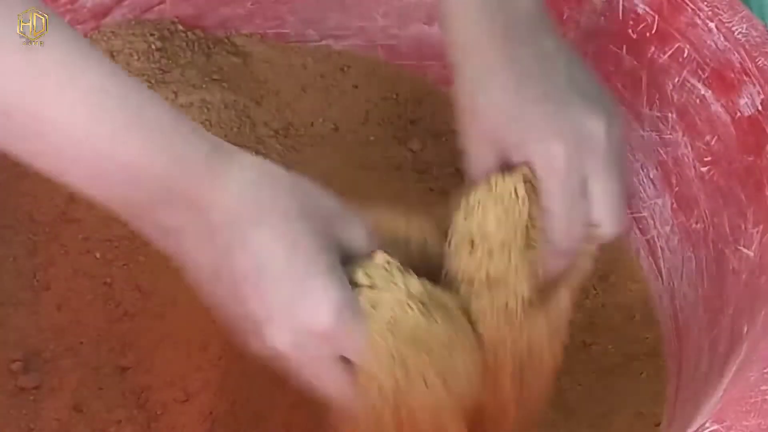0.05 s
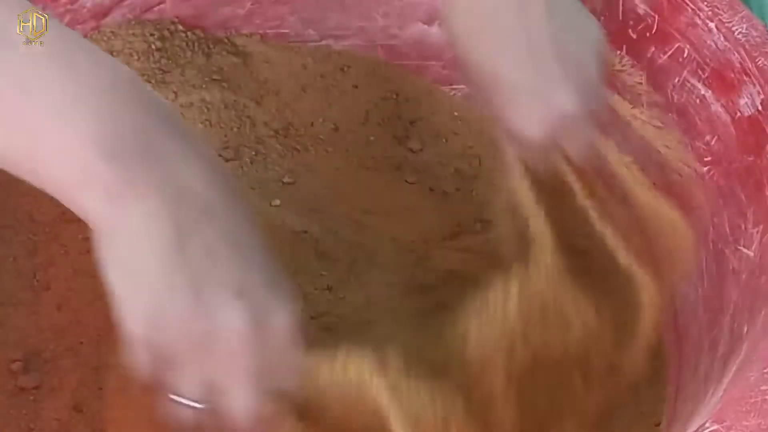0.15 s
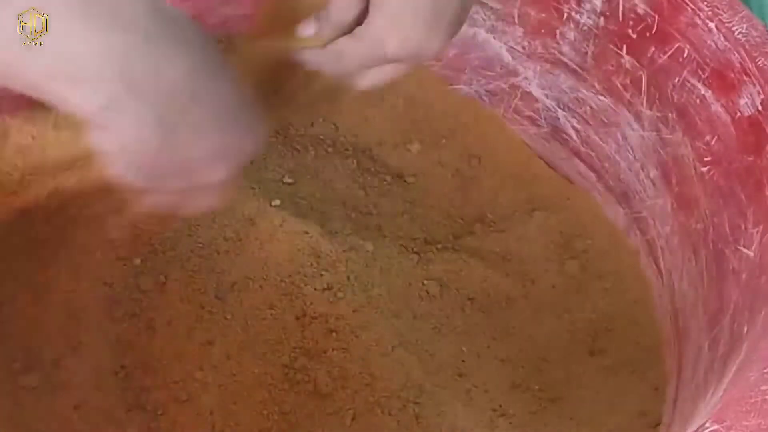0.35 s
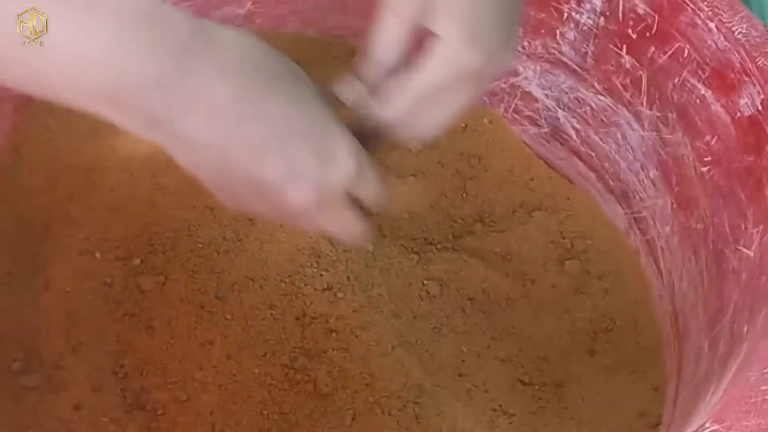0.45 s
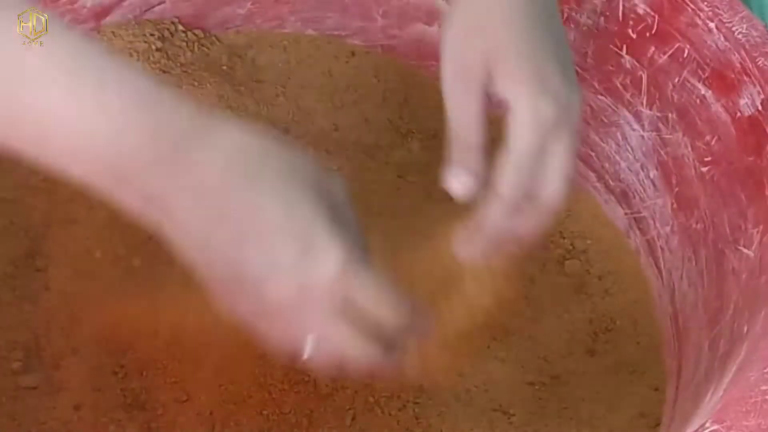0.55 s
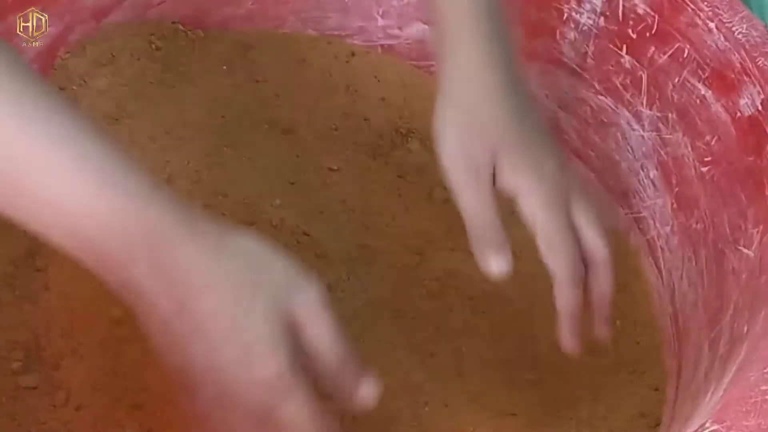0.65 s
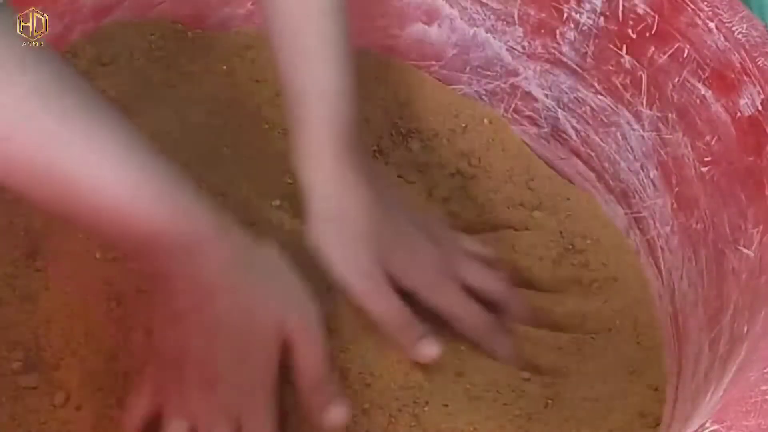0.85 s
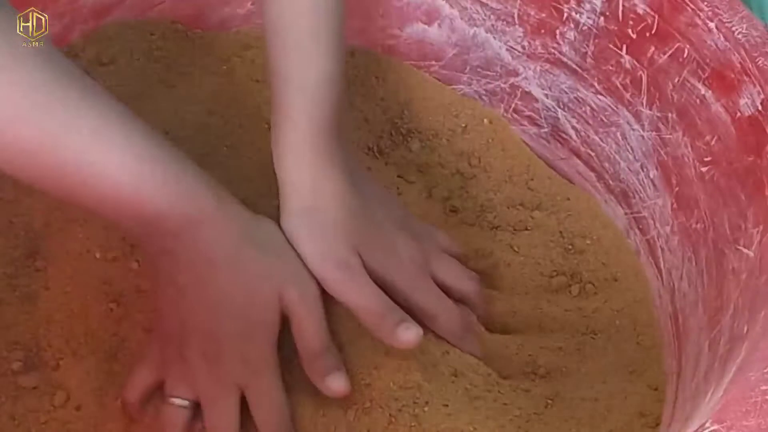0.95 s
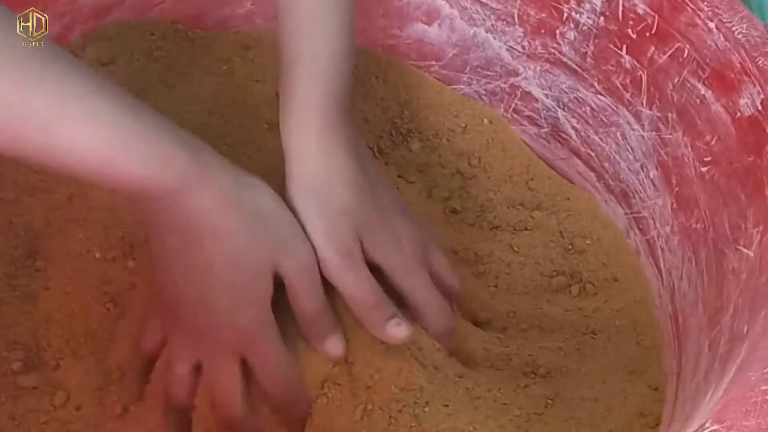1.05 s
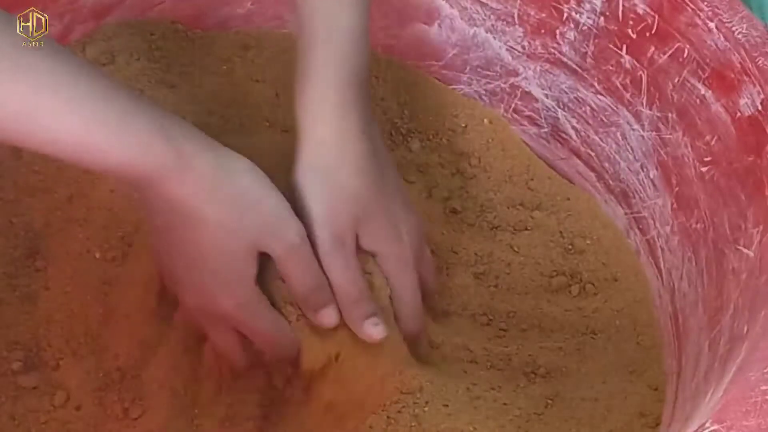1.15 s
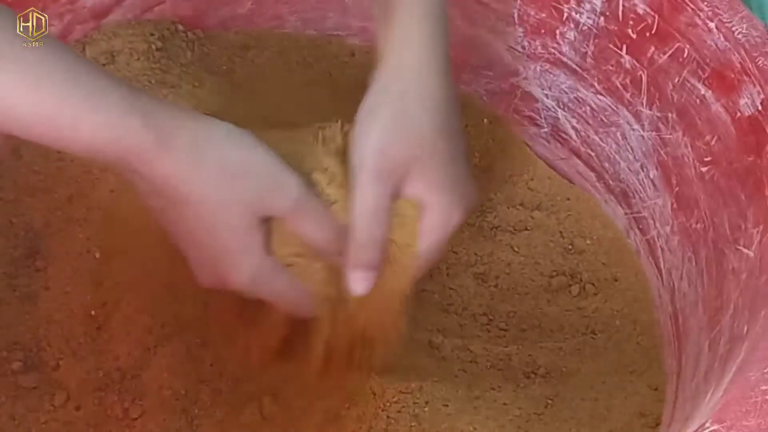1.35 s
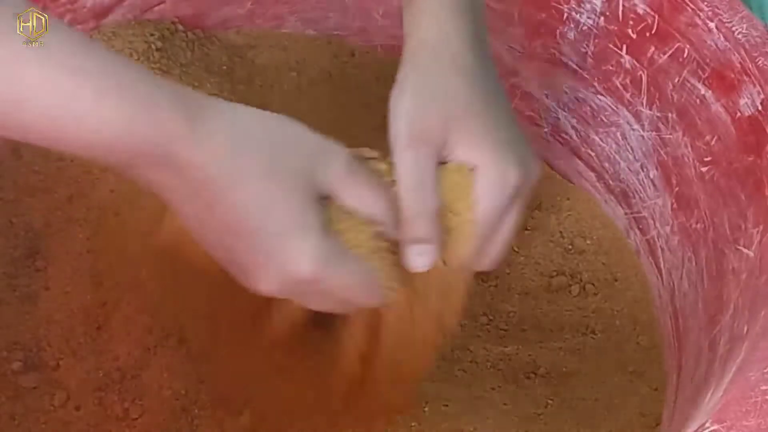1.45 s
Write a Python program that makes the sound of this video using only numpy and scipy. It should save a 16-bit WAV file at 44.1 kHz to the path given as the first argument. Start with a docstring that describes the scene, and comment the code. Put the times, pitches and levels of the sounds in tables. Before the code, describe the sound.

Dry sand crunches close up as hands crush a block from about 0.2 to 0.5 seconds, with sharp snaps and grains pattering into a plastic tub. A few crumbs tick down. At 0.8 seconds the hands land with a soft knock and a gritty push, then brush the sand with a quiet rustle fading by about 1.3 seconds. A small room hums faintly underneath.

```python
"""Crushing dry sand

Two hands crush a block of dry sand at close range: it snaps, crackles and pours into a plastic tub.
Each brittle fracture is a sharp crack plus the damped knock of a lump; stray crumbs tick down.
The hands land on the sand bed with a knock, push through it and brush it together with a gritty rustle.
The tub wall resonates, and a small room with a low hum answers faintly."""
import sys
import numpy as np
from scipy import signal
from scipy.fft import rfft, irfft, next_fast_len
from scipy.io import wavfile

SR = 44100
rng = np.random.default_rng(int(sys.argv[2]) if len(sys.argv) > 2 else 0)


def output_pcm(signal):
    """Save a mono or channel-first signal as 16-bit PCM at the path in sys.argv[1].

    Samples are clipped to [-1, 1] before scaling.
    """
    pcm = np.clip(np.atleast_2d(signal).T, -1, 1) * 32767
    wavfile.write(sys.argv[1], SR, np.round(pcm).astype(np.int16))


N = 66150
T = np.arange(N) / SR


def amp(db):
    """Amplitude ratio of a level in decibels."""
    return 10 ** (np.asarray(db) / 20)


def unit(x):
    """Normalisation to an rms of 1."""
    return x / np.sqrt(np.mean(x ** 2) + 1e-20)


def along(points, hz):
    """Interpolation of (frequency, value) points on a logarithmic frequency axis."""
    point_hz, values = np.transpose(points)
    return np.interp(np.log(hz + 1), np.log(point_hz + 1), values)


def curve(rows, column=1):
    """Linear interpolation of one column of a time table at every sample."""
    columns = np.transpose(rows)
    return np.interp(T, columns[0], columns[column])


def add(track, start_s, sound):
    """Superposition of a sound on a track, in place."""
    part = track[max(round(start_s * SR), 0):][:len(sound)]
    part += sound[:len(part)]


def band(x, kind, hz, order=2):
    """Maximally flat high-pass or low-pass filtering."""
    return signal.sosfilt(signal.butter(order, hz, kind, fs=SR, output="sos"), x)


def coloured(x, spectrum):
    """Minimum-phase filtering by a (frequency, gain) shape; the result has an rms of 1."""
    m = 2 * next_fast_len(N)
    gain = amp(along(spectrum, np.fft.rfftfreq(m, 1 / SR)))
    cepstrum = irfft(np.log(gain), m)
    cepstrum[1:m // 2] *= 2  # folding the cepstrum makes the filter causal
    cepstrum[m // 2 + 1:] = 0
    return unit(irfft(rfft(x, m) * np.exp(rfft(cepstrum)), m)[:N])


def grains(per_s, spread_db, hiss_db):
    """Shot noise: random grain contacts of uneven strength over the hiss of countless finer ones."""
    hits = rng.random(N) < per_s / SR
    strength = amp(spread_db * np.minimum(rng.standard_normal(N), 1.6))
    polarity = rng.choice([-1, 1], N)
    return unit(hits * strength * polarity) + amp(hiss_db) * rng.standard_normal(N)


def ring(modes, pitch_ratio=1, scatter=0):
    """Free vibration after a blow: exponentially damped modes, detuned at random by scatter."""
    t = np.arange(SR // 5) / SR
    vibration = np.zeros(len(t))
    for hz, db, t60 in modes:
        detuned_hz = hz * pitch_ratio * np.exp(scatter * rng.normal())
        vibration += amp(db - 60 * t / t60) * np.sin(2 * np.pi * detuned_hz * t)
    return vibration


def background():
    """The room's noise floor: steady hum tones over a continuous, bass-heavy spectrum."""
    # tones of the hum: pitch_hz, rms_db
    tones = [(100, -43), (142, -59.5), (200, -55)]
    # spectrum of the room noise: frequency_hz, gain_db
    spectrum = [(20, -54), (45, -34.5), (64, -4), (85, -12.5), (150, 1.5), (210, -10.5), (280, 2.5),
                (350, -13.5), (450, -12), (700, -22.5), (1100, -20), (2000, -26.5), (3500, -33.5),
                (16000, -55.5)]
    hum = sum(np.sqrt(2) * amp(db) * np.sin(2 * np.pi * (hz * T + rng.random())) for hz, db in tones)
    return hum + amp(-44.5) * coloured(rng.standard_normal(N), spectrum)


def trickle():
    """Tiny impacts give high-pitched shot noise as fine sand runs off the fingers."""
    # envelope of the trickle: time_s, level_db
    flow = [(0, -54), (.19, -55), (.56, -59), (.64, -55.5), (.688, -55), (.701, -44), (.716, -62),
            (.755, -49), (.785, -55), (.90, -54), (.97, -49.5), (1.025, -53.5), (1.11, -45.5),
            (1.19, -54.5), (1.255, -52.5), (1.29, -56.5), (1.5, -62.5)]
    # spectrum of fine grains: frequency_hz, gain_db
    spectrum = [(200, -33), (2000, -16), (5000, -11.5), (7500, -3.5), (11000, 0), (13500, -4.5),
                (16000, -16)]
    return amp(curve(flow)) * coloured(grains(per_s=900, spread_db=5, hiss_db=4), spectrum)


def rub():
    """Sliding friction of palms on the sand bed; the rustle dulls as the strokes slow."""
    # palm strokes: time_s, level_db, cutoff_hz
    strokes = [(.80, -100, 4000), (.84, -43.5, 4000), (.90, -36.5, 4060), (.985, -37, 3800),
               (1.028, -46.5, 4300), (1.065, -39.5, 4000), (1.105, -38, 2900), (1.16, -48, 3100),
               (1.215, -48.5, 2520), (1.24, -47.5, 1900), (1.28, -51.5, 2600), (1.5, -69, 2200)]
    # spectrum of the rustle before the moving low-pass: frequency_hz, gain_db
    spectrum = [(40, -17), (90, 12), (150, 3), (280, 6.5), (400, 0), (560, 3), (900, -2.5), (1700, -1),
                (3500, -5), (16000, -7)]
    rustle = coloured(grains(per_s=2600, spread_db=8.5, hiss_db=5), spectrum)
    hz, t, frames = signal.stft(rustle, SR, nperseg=512)
    cutoff_hz = np.interp(t, T, curve(strokes, column=2))
    low_pass = 1 / np.sqrt(1 + (hz[:, None] / cutoff_hz) ** 10)
    dulled = signal.istft(frames * low_pass, SR, nperseg=512)[1][:N]
    return amp(curve(strokes)) * unit(dulled)


def scrapes():
    """Friction of fingertips through the crust gives brief bursts of bright noise."""
    # fingertip strokes: middle_s, length_s, level_db
    strokes = [(0.821, .016, -30.5), (.876, 0.018, -29.5)]
    # spectrum of a scrape: frequency_hz, gain_db
    spectrum = [(300, -54), (1400, -40), (2300, 2), (3700, 3), (5200, -0.5), (8000, -5), (16000, -19)]
    envelope = sum(amp(db) * np.exp(-(2 * (T - middle_s) / length_s) ** 4)
                   for middle_s, length_s, db in strokes)
    return envelope * coloured(rng.standard_normal(N), spectrum)


def push():
    """Granular shear: grains slip and collide as the hands plough into loose sand."""
    # envelope of the push: time_s, level_db
    effort = [(.803, -100), (.814, -45), (.820, -26), (.834, -29.5), (.858, -25.5), (.876, -30),
              (.889, -36.5), (.94, -45), (1.2, -100)]
    # spectrum of sheared sand: frequency_hz, gain_db
    spectrum = [(60, -10), (140, 13), (350, 0.5), (800, 5.5), (1500, -4), (3800, -3), (5500, -0.5),
                (9500, 0.5), (13500, -3), (16000, -13)]
    return amp(curve(effort)) * coloured(grains(per_s=4300, spread_db=11.5, hiss_db=-2), spectrum)


def knock(pitch_hz):
    """Line broadening: the damped modes of a crumbly lump drift in phase too fast to give a note."""
    # modes of a lump: pitch_ratio, level_db, t60_s
    modes = [(.84, -5, .018), (1.06, -1, .016), (1.45, -6, .009), (2.8, -7, .005)]
    linewidth_hz = 110
    t = np.arange(SR // 5) / SR
    phase_steps = rng.standard_normal((len(modes), len(t))) * np.sqrt(2 * np.pi * linewidth_hz / SR)
    vibration = sum(amp(db - 60 * t / t60) * np.sin(2 * np.pi * pitch_hz * ratio * t + drift)
                    for (ratio, db, t60), drift in zip(modes, np.cumsum(phase_steps, axis=1)))
    return band(vibration, "high", 0.72 * pitch_hz, order=5)  # a lump radiates little below its pitch


def landings():
    """Impact excitation: the hands knock on lumps and drive the low modes of the tub."""
    # blows of the hands: start_s, level_db, pitch_hz
    blows = [(.8070, -12, 1060), (0.8166, -21, 940), (.8200, -16, 943), (1.237, -34.5, 970)]
    # modes of the tub under a blow: pitch_hz, level_db, t60_s
    thud_modes = [(170, -9, 0.046), (314, -15, 0.035), (580, -37, 0.031)]
    track = np.zeros(N)
    for start_s, db, pitch_hz in blows:
        add(track, start_s, amp(db) * (knock(pitch_hz) + ring(thud_modes, scatter=0.026)))
    track = band(track, "high", hz=111)
    return band(track, "low", hz=1800, order=4)  # a soft palm dulls the blow


def pour():
    """Dense impacts of sand falling on the bed merge into a dull patter."""
    # envelope of the falling sand: time_s, level_db
    flow = [(.19, -94), (.23, -31), (.30, -40.5), (.37, -29.5), (.408, -26), (.43, -32.5), (.485, -31),
            (.52, -46.5), (.56, -51), (.62, -58), (.75, -90)]
    # spectrum of the patter: frequency_hz, gain_db
    spectrum = [(30, -40), (70, -9), (140, 1), (280, -1.5), (450, -6.5), (1200, -7), (2500, -9),
                (5000, -11.5), (16000, -44)]
    return amp(curve(flow)) * coloured(grains(per_s=4000, spread_db=0.5, hiss_db=6), spectrum)


def crackle():
    """Acoustic emission: the block crackles with many tiny fractures as it is crushed."""
    # envelope of the crushing: time_s, level_db
    effort = [(.19, -100), (.213, -41.5), (.23, -24.5), (.243, -36.5), (.262, -25), (.277, -17.5),
              (.308, -19.5), (.325, -21), (.365, -24), (.40, -28), (.44, -30.5), (.492, -31.5), (.515, -45),
              (.55, -51), (.70, -100)]
    # spectrum of the crackle: frequency_hz, gain_db
    spectrum = [(100, -42), (450, -19.5), (700, -3.5), (950, 7), (1300, 3.5), (1900, -8.5), (3200, 1),
                (5200, -1), (9500, 3), (13500, 2), (16000, -7)]
    return amp(curve(effort)) * coloured(grains(per_s=3000, spread_db=7, hiss_db=-3), spectrum)


def crack(size):
    """A brittle tick with a burst of grit, peak 1; mode frequencies vary inversely with size."""
    # modes of a piece of size 1: pitch_hz, level_db, t60_s
    modes = [(3065, -7.5, 0.0043), (7620, 4.5, 0.0019), (10460, -2, 0.0024)]
    grit_db, grit_t60_s = -8, 0.0038
    tick = ring(modes, pitch_ratio=1 / size, scatter=0.07)
    t = np.arange(len(tick)) / SR
    tick += amp(grit_db - 60 * t / grit_t60_s) * rng.standard_normal(len(t))
    return tick / np.abs(tick).max()


def fractures():
    """Brittle fracture and impact: each snap or falling crumb is a crack plus the knock of a lump."""
    # fractures of the block: start_s, crack_db, size_ratio, knock_db, knock_pitch_hz
    snaps = [(.2229, -18.5, 1.3, -16, 1146), (.2289, -4, 0.81, -36, 1310), (0.2292, -42, .8, -25, 1240),
             (.2498, 3, .95, -12.5, 1225), (.2577, -11, 1, -18, 1310), (.2656, -18, .8, -42, 1200),
             (0.2672, -1.5, 1.04, -17, 1210), (0.2783, -0.5, 0.77, -30, 1150),
             (.2840, -3.5, 0.99, -29, 1100), (.2884, 0, 0.79, -24, 1120), (0.2919, -7.5, 0.92, -20, 1170),
             (0.2988, 5, 0.74, -13, 1110), (0.3016, -1, 1.32, -10, 1013), (0.308, 0, 0.84, -20, 1070),
             (0.3119, 4, 0.79, -19, 1160), (.3180, -6, 0.86, -35.5, 1100), (.3331, 0, 0.61, -40.5, 1110),
             (0.3365, 5, 1.01, -20, 1250), (0.3403, 1, 0.83, -21, 1010), (0.3498, -11, .9, -22, 945),
             (0.3688, -2.5, 1.07, -20, 1040), (0.3849, 9, 1.08, -11, 994), (0.3947, -8.5, 1.1, -36, 990),
             (.4090, -39, 1.2, -17.5, 860), (0.4109, -20, 1, -19.5, 1160), (.4498, -5, 1.35, -25, 1270),
             (0.453, -21, 1.7, -23, 1460), (0.4569, -23, 0.59, -43, 1330), (.4720, -22, 0.64, -18.5, 1400),
             (0.4763, -16, 1.8, -13.5, 1320), (0.4841, -9.5, 1.03, -17.5, 1190),
             (0.4913, -12, 0.56, -21.5, 1404)]
    # stray crumbs landing: start_s, level_db, size_ratio
    crumbs = [(.081, -49, 0.5), (0.1882, -33, 0.49), (.2050, -23, 0.73), (0.209, -30, 0.38),
              (0.2184, -24, 1.7), (.5008, -44, 0.68), (0.5303, -13, 0.81), (0.5775, -24, 0.79),
              (0.604, -30.5, 0.93), (.6989, -51, 0.54), (0.6995, -43, 0.48), (.7310, -22, 0.93),
              (.7423, -22, 0.815), (.7649, -33, 1.1), (.7967, -22, 0.38), (0.8204, -25, 1.6),
              (0.8725, -21, 1.13), (.9641, -24, 0.76)]
    track = np.zeros(N)
    for start_s, crack_db, size, knock_db, pitch_hz in snaps:
        add(track, start_s, amp(crack_db) * crack(size) + amp(knock_db) * knock(pitch_hz))
    for start_s, db, size in crumbs:
        knock_gain = amp(-17) * size ** 3.2  # bigger crumbs knock much more
        add(track, start_s, amp(db) * (crack(size) + knock_gain * knock(pitch_hz=1470)))
    return band(track, "high", hz=556)  # small pieces radiate little bass


def tub(x):
    """Forced vibration: the plastic wall resonates with whatever sounds inside it."""
    # modes of the wall: pitch_hz, level_db, t60_s
    modes = [(864, -12, 0.42), (926.6, 4, 0.079), (1018, 2, 0.14), (1221, -0.5, 0.15), (1335, -2.5, 0.17),
             (1400, -5, 0.12)]
    response = ring(modes)
    return signal.fftconvolve(x, response / np.linalg.norm(response))[:N]


def room(x):
    """Diffuse reverberation: convolution with noise that decays at a rate set by frequency."""
    # reverberation time of the room: frequency_hz, t60_s
    decay_times = [(200, 0.31), (1200, .18), (10000, 0.23)]
    hz, t, frames = signal.stft(rng.standard_normal(SR // 2), SR, nperseg=256)
    decay = amp(-60 * t / along(decay_times, hz)[:, None])
    tail = signal.istft(frames * decay, SR, nperseg=256)[1]
    return signal.fftconvolve(x, tail / np.linalg.norm(tail))[:N]


def scene():
    """Superposition of the direct sound, the responses of tub and room, and the background, in mono."""
    sand = fractures() + landings() + crackle() + pour() + trickle() + push() + scrapes() + rub()
    return (sand + amp(-24) * tub(sand) + amp(-15) * room(sand) + background())[None]


def record(dry):
    """Soft saturation rounds the loudest snaps; a sharp low-pass limits the bandwidth."""
    top_hz = 15700
    clipped = dry / (1 + np.abs(dry) ** 6) ** (1 / 6)
    m = 2 * next_fast_len(N)
    passband = np.fft.rfftfreq(m, 1 / SR) < top_hz
    return irfft(rfft(clipped, m) * passband, m)[..., :N]


dry = scene()
out = record(dry)
output_pcm(out)
```